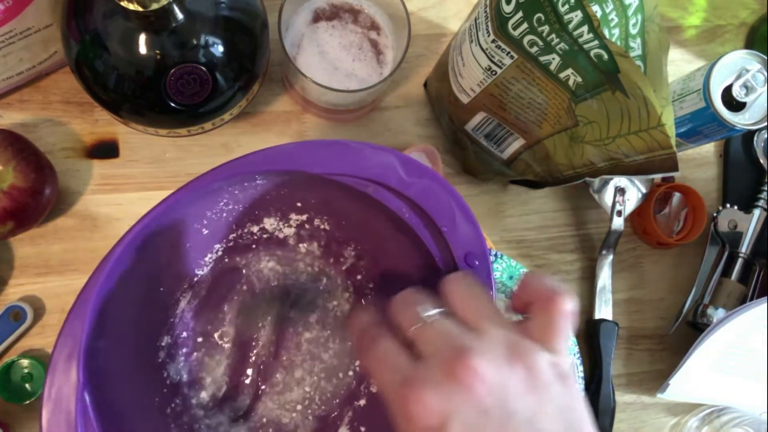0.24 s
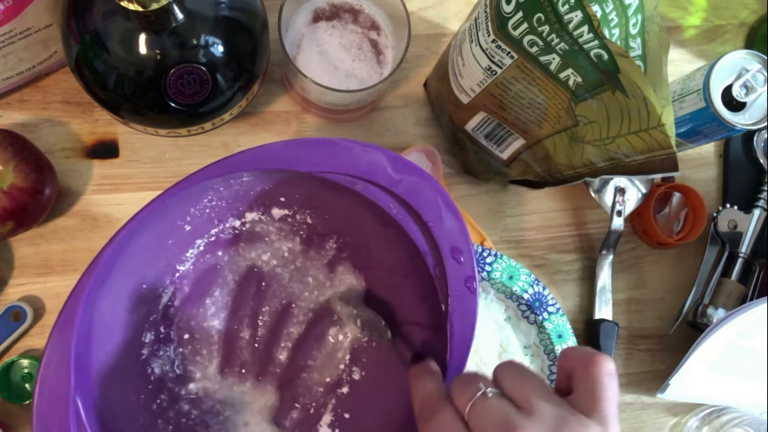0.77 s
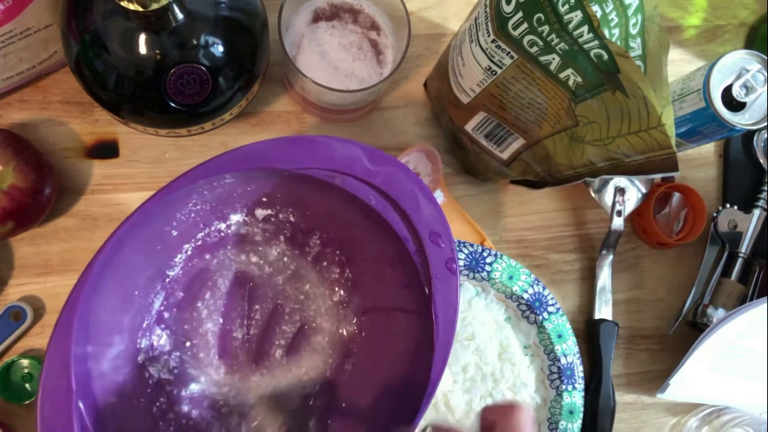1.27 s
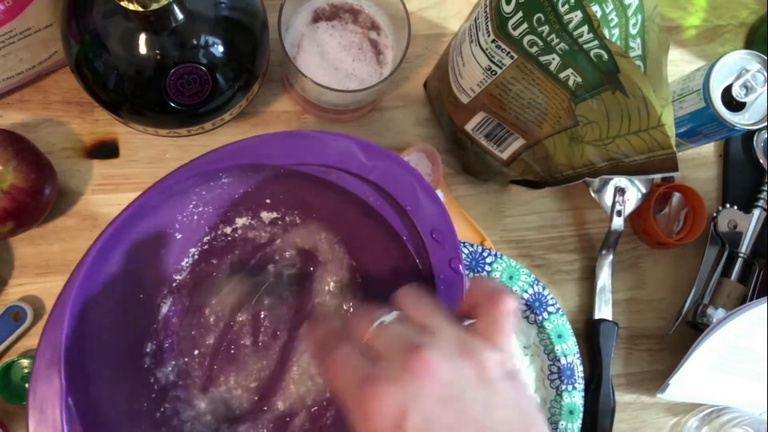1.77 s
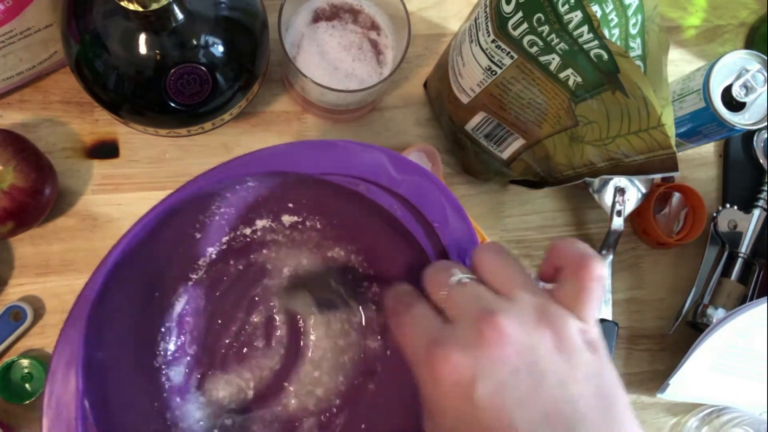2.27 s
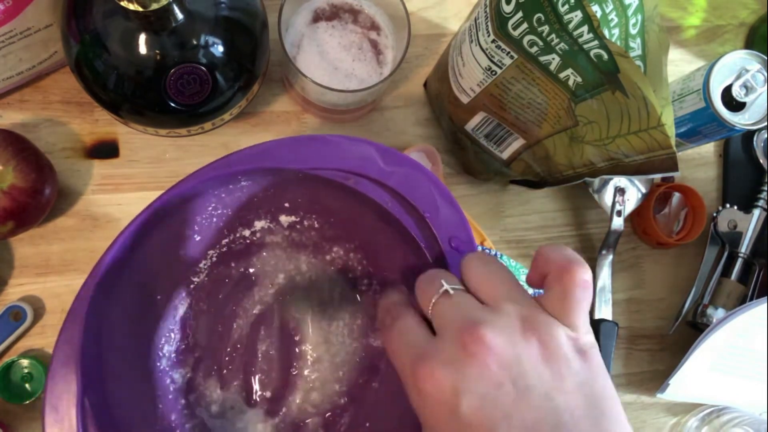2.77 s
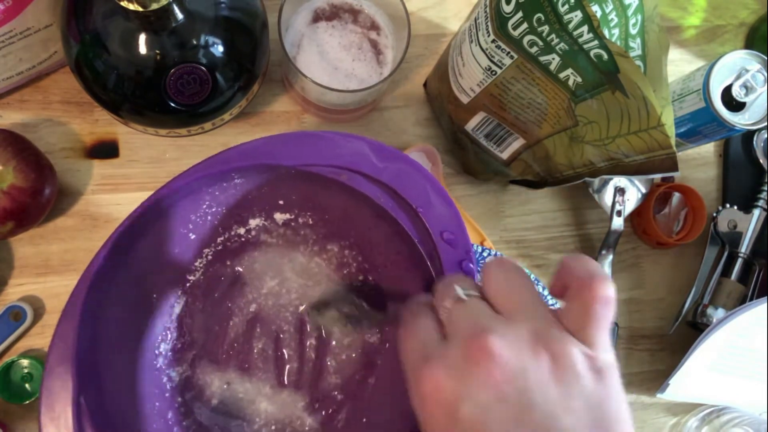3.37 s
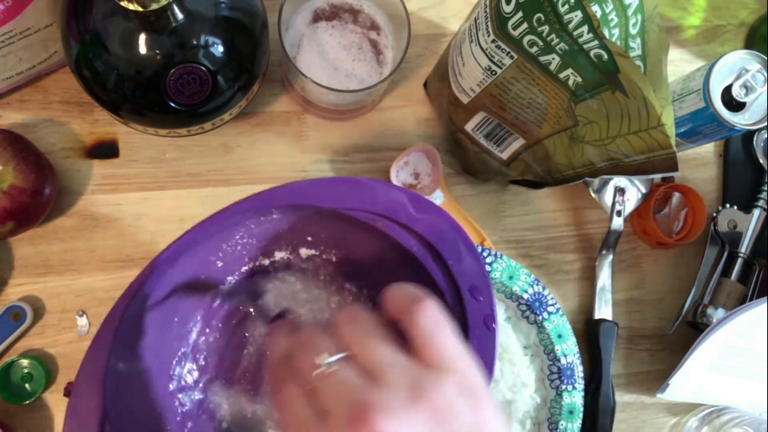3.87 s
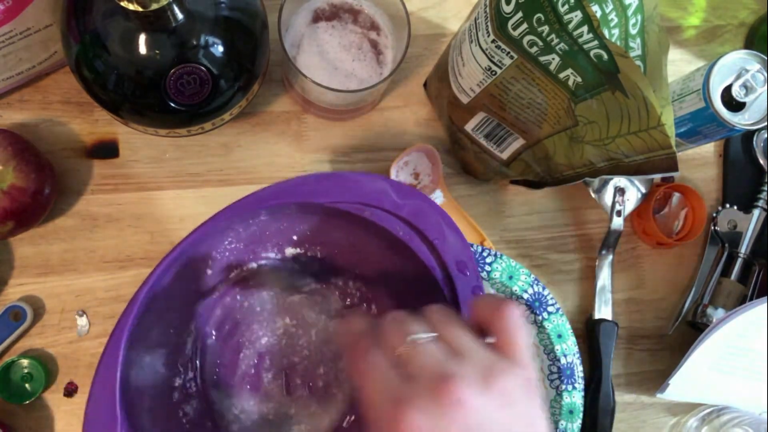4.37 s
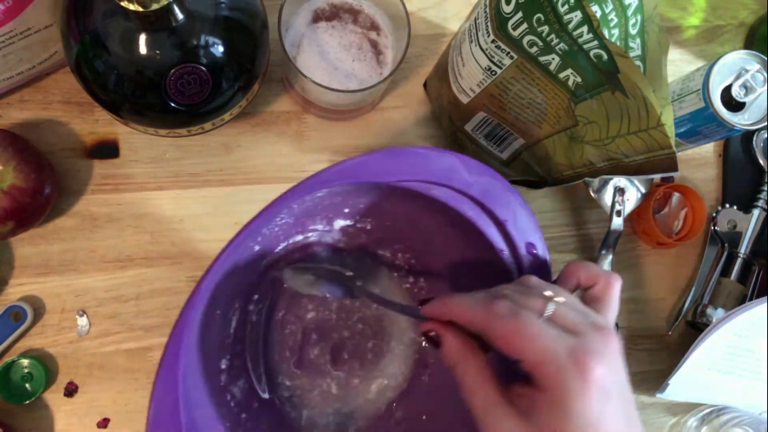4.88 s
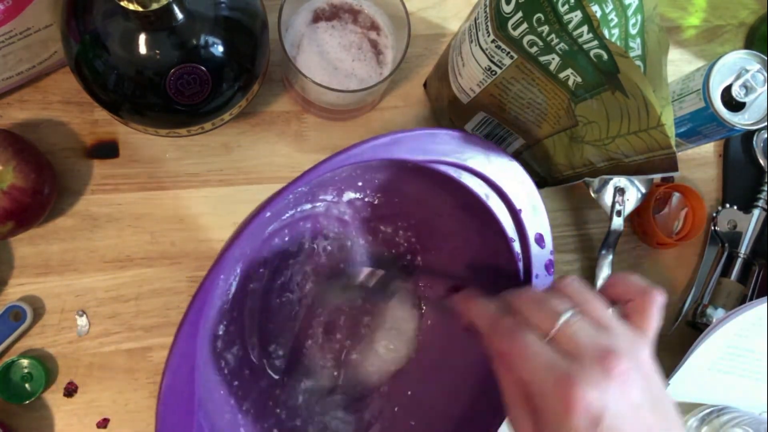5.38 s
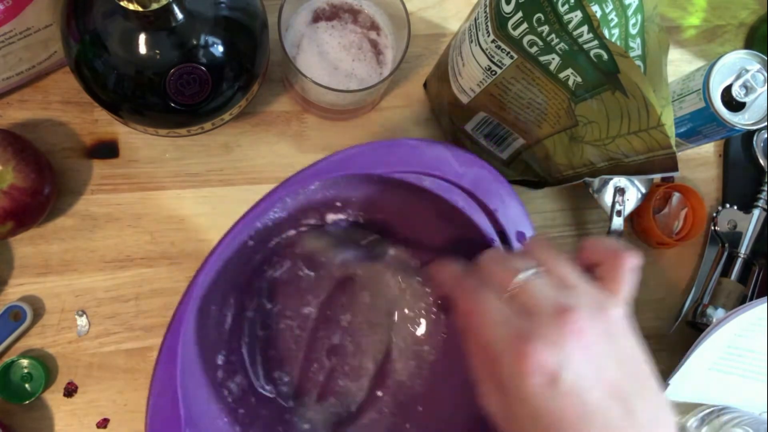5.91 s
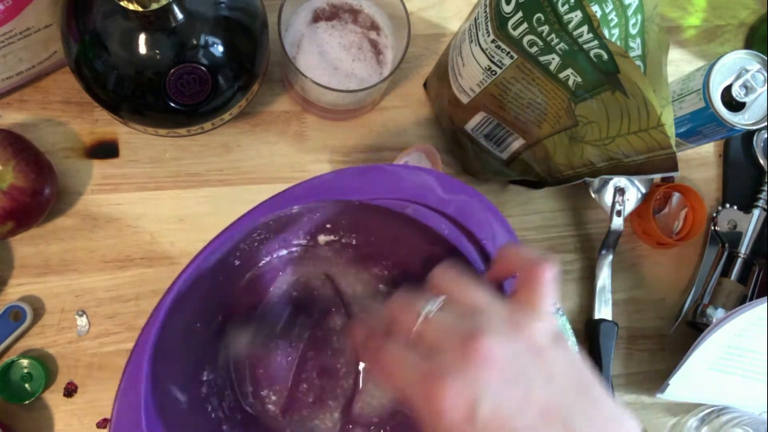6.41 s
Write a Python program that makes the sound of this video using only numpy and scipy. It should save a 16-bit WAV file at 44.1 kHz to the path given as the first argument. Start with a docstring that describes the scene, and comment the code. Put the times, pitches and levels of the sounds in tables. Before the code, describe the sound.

Close up in a small kitchen, a metal spoon stirs grainy sugar in a plastic bowl. Rapid hard scrapes crunch and fizz, alternating with lighter sweeps, and the bowl wall answers with hollow, pitch-bending bonks. Midway the strokes soften and lengthen, then a few louder hollow scrapes follow. Occasional taps and tiny squeals stand out over a very faint low hum.

```python
"""A light scrape comes first over a faint hum: a metal spoon stirs wet sugar round a plastic bowl, heard close up.
Hard digs and light sweeps crunch the crystals: random clicks ring the bowl's modes, and small cracks add fizz.
Friction drives the bowl's wall, whose pitch bends as the spoon bears on it; it bonks as it springs free.
The floor of the bowl groans at hard shoves. Now and then the spoon lifts, lands, squeals or knocks the plastic.
Lumps of sugar burst, and the small kitchen adds a short, quiet tail and the hum of an appliance."""
import sys
import numpy as np
from scipy import signal
from scipy.io import wavfile
from scipy.ndimage import uniform_filter1d

SR = 44100
rng = np.random.default_rng(int(sys.argv[2]) if len(sys.argv) > 2 else 0)


def to_wav(sig):
    """Store sig (one row per channel, or 1-D mono) as 16-bit WAV at the path in sys.argv[1].

    Samples outside -1..1 are clipped; the rate is SR.
    """
    pcm = np.clip(np.atleast_2d(sig), -1, 1) * 32767
    pcm = np.round(pcm).astype(np.int16)
    wavfile.write(sys.argv[1], SR, pcm.T)  # frames by channels


N = 293265
TIME = np.arange(N) / SR
CONTROL_TIME = TIME[::32]  # slow controls are worked out at every 32nd sample only

# room air, filter curve: (f/Hz, gain/dB)
ROOM_AIR_COLOUR = [(30, -16), (58, 3), (100, -2), (160, 7.5), (230, 3.5), (400, 3.5), (900, -20),
                   (16000, -23)]
# appliance hum: (f/Hz, level/dB)
HUM_TONES = [(156.8, -63.5)]
# the spoon digs through the sugar and bears on the bowl, one row a stroke:
# (middle t/s, length/s, level/dB, extra fizz level/dB, hollow wall ring before HOLLOW_SHARE/dB,
#  wall pitch aimed for, before BEND_GAIN f/Hz)
DIG_STROKES = [(0.215, 0.14, -18.5, 5.5, -7, 893), (0.368, 0.21, -27, 6, -0.5, 830),
               (0.472, 0.15, -21.5, 5.5, -2.5, 894), (0.628, 0.13, -18.5, -1, -4, 922),
               (0.725, 0.12, -21, 3, 1, 886), (0.875, 0.14, -19.5, -6, -5, 907),
               (0.949, 0.081, -27, -17, 4, 820), (1.505, 0.11, -27.5, -3, 4.5, 897),
               (1.595, 0.1, -23, 3, -1, 900), (1.78, 0.17, -24.5, 4, -1, 850),
               (1.886, 0.21, -26.5, 2, -1, 786), (2.085, 0.17, -21.5, 0, -0.5, 908),
               (2.385, 0.17, -25, 0, 1.5, 940), (2.485, 0.12, -21, 6, -6, 826),
               (2.632, 0.19, -25, 0, 0, 868), (2.744, 0.12, -21, 7, -8, 840),
               (2.891, 0.14, -21, 1, -2.5, 866), (3.01, 0.11, -18.5, 4.5, -2, 898),
               (3.164, 0.19, -24.5, -21, 1.5, 827), (3.274, 0.11, -20.5, 2.5, -5, 827),
               (3.41, 0.14, -28, -1.5, -0.5, 844), (3.547, 0.15, -31.0, -17, 3, 825),
               (4.185, 0.11, -27, 2, -2.5, 879), (4.596, 0.24, -38, -4, 6, 907),
               (4.865, 0.21, -32, 3, -1, 786), (5.115, 0.18, -38, 3, 2, 823),
               (5.261, 0.13, -30, -1, 5, 877), (5.501, 0.21, -24.5, -0.5, -2, 878),
               (5.678, 0.15, -25, -6, -3, 887), (5.875, 0.29, -28, 1.5, -3.5, 808),
               (6.388, 0.2, -26, -0.5, 1.5, 908)]
# the spoon sweeps lightly back along the side; same columns
SWEEP_STROKES = [(0.0, 0.1, -33.5, -4, 3.5, 747), (0.115, 0.12, -32.5, -0.5, -12, 795),
                 (0.819, 0.15, -32.5, 3, 1, 810), (0.979, 0.093, -25, 1, -12, 816),
                 (1.086, 0.11, -24.5, -2, -10, 803), (1.197, 0.13, -28.5, 2, -6, 803),
                 (1.282, 0.16, -31, 6, -1.5, 801), (1.402, 0.14, -29, 4, -2, 808),
                 (1.639, 0.094, -26.5, 1.5, -2, 790), (1.941, 0.086, -22.5, -1, -10.5, 745),
                 (2.194, 0.24, -24.5, -2.5, -4, 766), (3.738, 0.16, -34.5, 4, 2.5, 683),
                 (3.831, 0.11, -33.5, 2, 5, 640), (3.999, 0.28, -29, 1.5, -4, 746.5),
                 (4.251, 0.16, -20.5, -3.5, -9, 688), (4.42, 0.21, -21, -7, -10.5, 727),
                 (4.498, 0.14, -23.5, -6, -7, 723), (4.683, 0.16, -22, 0, -11.5, 737),
                 (5.334, 0.12, -33, 1, 2, 671), (5.727, 0.045, -24, 1, -3.5, 810),
                 (6.061, 0.15, -21.5, 1, -2, 801), (6.188, 0.2, -31, 3, -4.5, 798),
                 (6.283, 0.12, -24.5, -4, -7.5, 810), (6.521, 0.17, -22.5, 1.5, -7, 782),
                 (6.606, 0.38, -36.5, 1, 1.5, 730)]
# how each layer follows a stroke: name: (level relative to it/dB, lag/stroke lengths, half-width/stroke lengths)
# a dig rasps, and the bowl's floor springs back after it
DIG_RESPONSE = {"crunch": (-5, -0.028, 0.49), "fizz": (-13, -0.037, 0.45), "rasp": (-6.5, -0.0058, 0.49),
                "wall": (-3, -0.019, 0.58), "floor": (-33.5, 0.41, 0.7), "steel": (-24.5, -.02, 0.15)}
# a sweep hisses, and the wall rings on behind it
SWEEP_RESPONSE = {"crunch": (-6, 0.018, 0.35), "fizz": (-8, 0.028, 0.5), "rasp": (-17, 0.041, 0.54),
                  "wall": (-4.5, 0.03, 0.83), "floor": (-37, 0.6, 0.34), "steel": (-12.5, 0.018, 0.43)}
# level each layer gains per dB of a stroke's hollow ring: name: share/(dB per dB)
HOLLOW_SHARE = {"rasp": 0.35, "wall": 0.91, "steel": -0.31}
# crunch of the sugar, filter curve: (f/Hz, gain/dB)
CRUNCH_COLOUR = [(500, 1.5), (1200, -30.5), (2000, -9), (2400, 5), (3200, 6), (3700, 4), (4500, 4),
                 (5200, 4), (5900, -4), (8000, -7.5), (15000, -25.5)]
# fizz of the smallest crystals, filter curve: (f/Hz, gain/dB)
FIZZ_COLOUR = [(800, -48), (3500, -3), (5800, 2.5), (7000, -0.5), (8300, 1.5), (9100, 4.5), (9600, 2),
               (10500, -8), (12500, -7.5), (15500, -10)]
# what the bowl rings with, middle modes: (f/Hz, narrowest width/Hz, level/dB)
MIDDLE_MODES = [(1350.5, 33, 1), (1615, 65, -5.5), (2080, 62, -8), (2290, 43, -1)]
# the bowl's high modes; same columns
HIGH_MODES = [(2634, 108, 2.4), (3091, 60, 9.3), (3545, 244, 0.39), (4010, 264, 6), (4480, 48, 11),
              (4830, 86, 6.8), (5100, 38, 8.6)]
# modes of the spoon itself; same columns
SPOON_MODES = [(2955, 180, -3), (4290, 230, 0.5), (4433, 100, 7), (4730, 104, 3.5)]
# rasp of the wall, filter curve: (f/Hz, gain/dB)
RASP_COLOUR = [(300, -68.5), (620, -57.5), (950, 11), (1200, -1.5), (1600, -1), (2200, -1.5), (3000, -33)]
# the wall while the spoon presses it, filter curve: (f/Hz, gain/dB)
PRESSED_WALL_COLOUR = [(300, -28.5), (570, 6), (680, -2), (950, -5), (1300, 0.5)]
# how long the kitchen's tail takes to fall by 60 dB: (f/Hz, decay time/s)
KITCHEN_DECAY = [(200, 0.78), (800, 0.13), (16000, 0.15)]
# the spoon eases off the bowl and lands again: (landing t/s, depth of lift/dB, bite on landing/dB)
SPOON_LANDINGS = [(0.0736, 4, 13.5), (0.322, 15, 5.5), (0.431, 7, 8), (0.687, 7.5, 1), (0.801, 6, 4.5),
                  (0.919, 10, 4), (1.064, -0.5, 11), (1.164, 4, 5.5), (1.368, 9.5, 8), (1.87, 5.5, 5),
                  (2.003, 3, 5.5), (3.232, 6.5, 6), (3.503, 6, 7.5), (3.92, 17, 0.5), (5.316, 9, 4)]
# the wall springs free with a hollow bonk: (middle t/s, half-width/s, peak level/dB, f/Hz)
WALL_BONKS = [(0.249, 0.03992, -21.5, 764.7), (0.436, 0.015, -16.5, 841.4), (0.499, 0.02994, -21, 775.8),
              (0.735, 0.0279, -18.5, 829.7), (0.867, 0.0352, -19, 876.2), (0.945, 0.022, -19.5, 857),
              (1.499, 0.02488, -20, 882), (1.712, 0.0135, -23, 764), (1.76, .016, -19.5, 826.3),
              (1.959, 0.0348, -21, 779.4), (2.019, 0.0215, -23, 763.4), (2.135, 0.0369, -17, 791.7),
              (2.237, 0.02147, -22, 778.7), (2.363, .02, -19, 932.3), (2.52, 0.02213, -22, 756.6),
              (2.623, 0.01534, -19, 851.8), (2.911, 0.015, -19, 817.5), (3.03, 0.0267, -19, 804.7),
              (3.183, 0.02, -19, 817.6), (3.241, 0.01553, -15, 859.7), (4.197, 0.0246, -20.5, 798.4),
              (4.303, 0.00687, -22, 690), (4.325, 0.00723, -22, 683.4), (4.711, 0.023, -22, 737.2),
              (5.248, 0.0122, -23, 900.5), (5.572, .013, -23.5, 809), (6.06, 0.0608, -21, 783),
              (6.358, 0.02504, -20, 860.5), (6.408, 0.026, -18, 913.3), (6.48, 0.019, -21, 788.7),
              (6.569, 0.0255, -17, 769.4)]
# the hardest shoves make the floor groan: (middle t/s, half-width/s, level/dB, f/Hz, glide/(Hz per s))
FLOOR_SHOVES = [(.265, .05, -41.5, 473, 500), (.52, 0.021, -33.5, 510, -1000), (2.235, 0.039, -35, 480, 0),
                (3.835, 0.092, -40.5, 530, 500), (4.161, 0.065, -41, 452, 1700),
                (4.295, 0.05, -31.5, 552, 0), (4.375, 0.058, -39, 475, -1300),
                (4.67, 0.12, -45.5, 501, 700), (6.135, 0.068, -42.5, 462, 1598),
                (6.2, 0.059, -34.5, 542, 300), (6.28, 0.037, -44, 493, -1700)]
# partials of that groan: (multiple of its pitch, level/dB)
GROAN_PARTIALS = [(0.999, -0.5), (1.25, -3)]
# the spoon's edge catches and squeals: (middle t/s, half-width/s, level/dB, f/Hz)
SPOON_SQUEALS = [(.457, 0.0064, -22.5, 3120), (.504, 0.0081, -26, 3180), (0.8934, 0.0023, -28, 4900),
                 (3.007, 0.011, -21.5, 4920), (4.231, 0.026, -27, 3050), (4.232, 0.019, -23, 4210),
                 (5.11, 0.033, -36, 2920), (6.054, 0.095, -32, 3146), (6.297, 0.037, -36.5, 3020),
                 (6.502, 0.024, -28.5, 3070)]
# the spoon knocks or catches on the plastic: (t/s, level during the chatter/dB,
#  wall thud relative to it/dB, treble relative to it/dB, fading time of the chatter/s)
SPOON_KNOCKS = [(0.4544, -25.5, -17, -14, .004), (0.478, -27.5, -17, 4, .004), (0.743, -25, -2, -8, 0.0061),
                (1.082, -29, -14, -16, 0.0034), (0.8905, -15.5, -6, -22, .0045),
                (1.6417, -21, -17, -11, .008), (5.315, -27, -1, -6, .009), (1.871, -33.5, 8.5, -19, 0.0066),
                (1.932, -31, -6, -0.5, 0.0033), (3.2361, -35.5, 9, -17, .005),
                (3.3024, -23, -11, -10, 0.008), (4.227, -27, -2, -20, 0.0045)]
# treble tick of a knock, filter curve: (f/Hz, gain/dB)
TICK_COLOUR = [(500, -16), (2000, 17), (5000, -7), (9000, 23), (16000, -13)]
# a lump of sugar bursts under the spoon: (t/s, level/dB)
SUGAR_LUMPS = [(0.463, -24), (.764, -27.5), (.966, -19.5), (2.773, -21.5), (3.275, -21.5), (5.678, -24)]

EDGE_POWER, SKIRT_DB = 1.72, -90  # how squarely a stroke swells and fades, and where its fade stops
FIZZ_EDGE_POWER = 1.7  # the same for the fizz
DIG_LEAN, SWEEP_LEAN = 0.1, 0.0095  # a stroke builds slowly, lets go fast: peak late by this share of a half-width
RASP_DB_PER_S, FLOOR_DB_PER_S, STEEL_DB_PER_S = 0.08, 0.8, .5  # slow change of colour as the stirring goes on
WALL_HZ = 780  # the wall's main mode when nothing presses on it
BEND_POWER, BEND_GAIN = 0.46, 1.136  # the wall's pitch bends with this power of the force
FIZZ_BRIGHTEN, FIZZ_PIVOT_DB = 0.21, -30.5  # above this force the finest cracks gain on the rest, by this power
FLUTTER_DB, FLUTTER_HZ = 2.0, 44.9  # the wall's free ring breaks up as the spoon sticks and slips
LOW_WALL_HZ, LOW_WALL_DB = 646, -16  # the wall's lower mode, which wanders and comes and goes
# the floor's note rises and grows as the wall's pitch sags, and wanders by a share of itself
FLOOR_HZ, FLOOR_HZ_PER_HZ, FLOOR_DB_PER_HZ, FLOOR_WANDER = 417, 0.93, 0.145, 0.12
RUB_HZ, RUB_DB, RUB_DB_PER_S = 346, -42, 1.4  # the bowl's base rubs on the counter, louder as time goes on
LIFT_S, BITE_S, LAND_S = 0.029, 0.014, .008  # time to ease off, for the bite to relax, and to land
UNEVEN_DB, UNEVEN_HZ = 1.03, 17  # the spoon's pressure wavers as it meets lumps
BONK_SAG_HZ_PER_S = 500  # the pitch falls as the wall relaxes
BONK_RELIEF_DB = -6  # the spoon's drag on the wall eases meanwhile
SQUEAL_WIDTH_HZ = 115  # width of the narrower of two resonances
KNOCK_DAMPING_HZ, SLIP_S = 110, .0014  # widening of modes by the spoon's touch; mean time between contacts
LUMP_S, LUMP_RASP_DB = 0.0073, -11.5  # half-width of a burst; how much of it reaches the middle modes


def amp(db):
    """Turns decibels into gain."""
    return np.exp(np.asarray(db) * (np.log(10) / 20))


def unit(x):
    """Scales a sound to rms 1."""
    return x / np.sqrt(np.mean(x ** 2) + 1e-20)


def read(points, hz):
    """Reads a curve at the given pitches, on a log-frequency axis."""
    f, value = np.transpose(points)
    return np.interp(np.log(hz + 1), np.log(f + 1), value)


def add(mix, s, sound):
    """Adds a sound to the mix at time s."""
    part = mix[max(round(s * SR), 0):][:len(sound)]
    part += sound[:len(part)]


def per_sample(control):
    """Draws a control, known at every 32nd sample, out over all samples."""
    return np.interp(TIME, CONTROL_TIME, control)


def drift(rate_hz):
    """A random wander of rms about 1: sixteen sines with random rates round rate_hz."""
    hz = rate_hz * rng.uniform(.15, 1.3, (16, 1))
    phase = rng.random((16, 1))
    angle = (2 * np.pi * (hz * CONTROL_TIME + phase)).astype(np.float32)
    return per_sample(np.sin(angle).sum(0) / np.sqrt(8))


def colour(x, points, size=2048):
    """A causal filter with the given spectrum, so that clicks keep their sharp front."""
    gain_db = np.maximum(read(points, abs(np.fft.fftfreq(size, 1 / SR))), -80)
    log_gain = np.log(amp(gain_db))
    taps = np.fft.ifft(np.exp(np.conj(signal.hilbert(log_gain)))).real
    return signal.oaconvolve(x, taps[:size // 2])[:len(x)]


def resonate(x, hz, width):
    """A resonance of gain 1 at a fixed pitch hz, or following the curve hz."""
    r = np.exp(-np.pi * width / SR)
    if np.ndim(hz) == 0:
        return 2 * signal.lfilter([1 - r], [1, -r * np.exp(2j * np.pi * hz / SR)], x + 1e-18).real
    # for a moving pitch: turn it down to 0 Hz, smooth, and turn it back up
    angle = (2 * np.pi * (np.cumsum(hz / SR) % 1)).astype(np.float32)
    turn = np.cos(angle) + 1j * np.sin(angle)
    return 2 * (turn * signal.lfilter([1 - r], [1, -r], x * turn.conj() + 1e-18)).real


def steady(x, span_s):
    """Evens out the slow level of a texture, leaving its fast grain."""
    size = max(int(span_s * SR), 8)
    power = uniform_filter1d(uniform_filter1d(x ** 2, size), size)
    return x / np.sqrt(abs(power) + 1e-12)


def swell(t, half_s, lean=0, power=EDGE_POWER):
    """The force of one push: 20 dB down half_s before and after its middle; a positive lean makes its peak late."""
    u = t / half_s - lean
    return amp(np.maximum(-20 * abs(u / (1 - np.sign(u) * lean)) ** power, SKIRT_DB))


def blend(sizes, pitches_hz):
    """Joins overlapping pushes on one mode into one size and one pitch."""
    power = sizes ** 2 + 1e-20
    size = np.sqrt(power.sum(0))
    pitch_hz = (power * pitches_hz).sum(0) / power.sum(0)
    return per_sample(size), per_sample(pitch_hz)


def crystals(per_s, spread_db, smear, slip_db):
    """Clicks of breaking crystals over a smooth smear of paste, bunched as the spoon sticks and slips."""
    sizes = amp(spread_db * np.minimum(rng.exponential(1, N), 4)) * rng.choice([-1, 1], N)
    clicks = unit(sizes * (rng.random(N) < per_s / SR))
    grains = clicks + smear * rng.standard_normal(N)
    return grains * amp(slip_db * drift(rate_hz=260))


def contact_ring(x, ring_s, direct, size=8192):
    """Every grain rings the bowl's dense high modes; which of them answer changes as the spoon moves on."""
    out, t = np.zeros(N), np.arange(size // 8) / SR
    for start in range(0, N, size // 2):
        ring = rng.standard_normal(len(t)) * np.exp(-t / ring_s)
        ring = ring / np.linalg.norm(ring) + direct * (t == 0)
        # overlapping stretches fade into each other
        first = max(start - size // 2, 0)
        part = x[first:start + size // 2]
        fade = np.cos(np.pi * (np.arange(len(part)) + first - start) / size)
        add(out, first / SR, signal.fftconvolve(part * fade, ring))
    return unit(out)


def moving_modes(drive, modes, bend, wander):
    """Each mode arches with the spoon's force, and drifts and fades as the point of contact moves."""
    out = np.zeros(N)
    for hz, width, db in modes:
        track_hz = hz * bend * (1 + wander * drift(rate_hz=7))
        fade_db = 4.8 * drift(rate_hz=14)
        out += amp(db + fade_db) * resonate(resonate(drive, track_hz, width), track_hz, 5 * width)
    return unit(out)


def groan(hz):
    """Uneven bumps ring one low mode that follows the curve hz; rms about 1."""
    bumps = crystals(per_s=260, spread_db=3.5, smear=0.4, slip_db=6.0)
    return steady(resonate(resonate(bumps, hz, 35), hz, 130), span_s=0.023)


def background():
    """Quiet room air is filtered noise; the appliance's hum is a sine that wavers a little."""
    hum = np.zeros(N)
    for hz, db in HUM_TONES:
        level = amp(db + 0.41 * drift(rate_hz=9)) * np.sqrt(2)
        hum += level * np.sin(2 * np.pi * hz * TIME + 0.15 * drift(rate_hz=2.18))
    air = unit(colour(rng.standard_normal(N), ROOM_AIR_COLOUR, size=8192))
    return hum + amp(-61.0) * air


def stroke_forces(layer):
    """For every dig and sweep: its force on one layer over time, its level there, and its wall pitch."""
    forces, levels_db = [], []
    power = FIZZ_EDGE_POWER if layer == "fizz" else EDGE_POWER
    groups = (DIG_STROKES, DIG_RESPONSE, DIG_LEAN), (SWEEP_STROKES, SWEEP_RESPONSE, SWEEP_LEAN)
    for strokes, response, lean in groups:
        s, length_s, level_db, bright_db, hollow_db, _ = np.transpose(strokes)[:, :, None]
        offset_db, lag, half = response[layer]
        forces.append(swell(CONTROL_TIME - s - lag * length_s, half * length_s, lean, power))
        layer_db = level_db + offset_db + HOLLOW_SHARE.get(layer, 0) * hollow_db
        levels_db.append(layer_db + (layer == "fizz") * bright_db)
    pitches_hz = np.vstack([DIG_STROKES, SWEEP_STROKES])[:, -1:]
    return np.vstack(forces), np.vstack(levels_db), pitches_hz


def strength(layer):
    """How hard all the strokes together drive one layer."""
    force, level_db, _ = stroke_forces(layer)
    return per_sample(np.linalg.norm(amp(level_db) * force, axis=0))


def wall_pitch():
    """The wall's pitch bends most at full force and returns to rest between strokes."""
    force, level_db, pitch_hz = stroke_forces("wall")
    power = (amp(level_db) * force) ** 2
    pull_hz = (power * (pitch_hz - WALL_HZ) * force ** BEND_POWER).sum(0)
    bend_hz = pull_hz / (power.sum(0) + amp(-74) ** 2)
    return per_sample(WALL_HZ + BEND_GAIN * bend_hz)


def crunch(stiffness):
    """Sugar ground between spoon and plastic rings the bowl's high modes."""
    grit = crystals(per_s=750, spread_db=3.2, smear=.11, slip_db=2.2)
    ringing = moving_modes(grit, HIGH_MODES, stiffness ** 0.261, wander=0.0227)
    dense = contact_ring(grit, ring_s=.0046, direct=.18)
    return steady(colour(ringing + 1.81 * dense, CRUNCH_COLOUR), span_s=0.024)


def fizz(force):
    """The smallest crystals crack, each size in its own band; the finest need the most force."""
    bands = [[(8000, 0), (10000, -20)], [(8000, -20), (10000, 0)]]  # (f/Hz, gain/dB): coarse, then fine
    cracks = [colour(crystals(per_s=1700, spread_db=3.5, smear=.28, slip_db=2.2), band) for band in bands]
    coarse, fine = [crack * amp(2.0 * drift(rate_hz=40)) for crack in cracks]
    fine_gain = (force / amp(FIZZ_PIVOT_DB)) ** FIZZ_BRIGHTEN
    sound = contact_ring(coarse + fine * fine_gain, ring_s=.0036, direct=.22)
    return force * steady(colour(sound, FIZZ_COLOUR), span_s=0.012)


def steel(drag):
    """Friction makes the spoon's own modes ring, each coming and going."""
    sound = np.zeros(N)
    for hz, width, db in SPOON_MODES:
        ring = resonate(resonate(drag, hz, width), hz, 3 * width)
        sound += amp(db + 4.3 * drift(rate_hz=9)) * ring
    return steady(sound, span_s=0.023)


def rasp(drag, stiffness):
    """Friction rings the wall's middle modes."""
    sound = moving_modes(drag, MIDDLE_MODES, stiffness ** 0.38, wander=0.039)
    sound += .65 * contact_ring(colour(drag, RASP_COLOUR), ring_s=.0026, direct=.17)
    return steady(sound, span_s=0.035)


def without_bass(x):
    """A steep cut below 620 Hz keeps the sugar, spoon and scrape thin and free of rumble."""
    return signal.sosfilt(signal.butter(4, 620, "highpass", fs=SR, output="sos"), x)


def wall(drag, gain, pitch_hz):
    """Friction drives the main wall mode: hoarse while the spoon bends it, a clear hollow ring when it runs free."""
    bent_hz = pitch_hz * (1 + .035 * drift(rate_hz=28))
    pressed = resonate(resonate(drag, bent_hz, 80), bent_hz, 300)
    pressed = steady(colour(pressed, PRESSED_WALL_COLOUR), span_s=0.037)
    # the free ring stays near the resting pitch
    ring_hz = np.clip(uniform_filter1d(pitch_hz, SR // 20), WALL_HZ - 45, WALL_HZ + 35)
    ring_hz = ring_hz * (1 + .016 * drift(rate_hz=20))
    free = steady(resonate(resonate(drag, ring_hz, 22), ring_hz, 70), span_s=.024)
    freedom = .85 / (1 + ((pitch_hz - WALL_HZ + 8) / 58) ** 4)
    # the free ring outlasts the push that started it
    keep = np.exp(-1 / (.008 * SR))
    ring_power = signal.lfilter([1 - keep], [1, -keep], gain ** 2 * freedom)
    ring_gain = np.sqrt(ring_power + amp(-75.0) ** 2)
    flutter = amp(FLUTTER_DB * (drift(rate_hz=FLUTTER_HZ) - .5))
    low = groan(LOW_WALL_HZ * (1 + .03 * drift(rate_hz=10))) * amp(4 * drift(rate_hz=18))
    sound = gain * np.sqrt(1 - freedom) * pressed + ring_gain * flutter * free
    sound += amp(LOW_WALL_DB) * strength("wall") * low
    return colour(sound, [(350, -20.0), (560, -32.5), (650, 1.5)])  # keeps the wall's sound light in the bass


def flex(wall_hz):
    """The floor gives unevenly after each stroke, more when the wall is slack; the base rubs with that force's root."""
    slack_hz = np.maximum(WALL_HZ - wall_hz, 0)
    growth = amp(FLOOR_DB_PER_HZ * slack_hz + FLOOR_DB_PER_S * TIME)
    give = strength("floor") * growth + amp(-59.5)
    wander = FLOOR_WANDER * drift(rate_hz=9)
    give_hz = (FLOOR_HZ + FLOOR_HZ_PER_HZ * slack_hz) * (1 + wander)
    rub_hz = RUB_HZ * (1 + wander / 2)
    note, rub = [amp(4.26 * drift(rate_hz=16)) * groan(hz) for hz in (give_hz, rub_hz)]
    return give * note + np.sqrt(give) * amp(RUB_DB + RUB_DB_PER_S * TIME) * rub


def kitchen(x):
    """A short diffuse tail that starts 4 ms after each sound, each band dying at its own speed."""
    taps = rng.standard_normal(SR // 2) * (np.arange(SR // 2) > .004 * SR)
    hz, t, bands = signal.stft(taps, SR, nperseg=256)
    decay = amp(-60 * t / read(KITCHEN_DECAY, hz)[:, None])
    tail = signal.istft(bands * decay, SR, nperseg=256)[1]
    return signal.oaconvolve(x, tail / np.linalg.norm(tail))[:N]


def contact():
    """The spoon's grip on the bowl: it wavers, changes as the spoon lifts before a landing, and bites just after."""
    s, lift_db, bite_db = np.transpose(SPOON_LANDINGS)[:, :, None]
    t = CONTROL_TIME - s
    step_db = np.where(t < 0, -lift_db * np.exp(-(t / LIFT_S) ** 2), bite_db * np.exp(-abs(t) / BITE_S))
    landing_db = uniform_filter1d(per_sample(step_db.sum(0)), int(LAND_S * SR))
    return amp(landing_db + UNEVEN_DB * drift(rate_hz=UNEVEN_HZ))


def bonks():
    """The wall's free swings: their nearly pure tone, and the share of the spoon's drag that is left."""
    s, half_s, peak_db, pitch_hz = np.transpose(WALL_BONKS)[:, :, None]
    t = CONTROL_TIME - s
    force = swell(t, half_s, lean=-0.119)  # it starts faster than it dies
    sagging_hz = pitch_hz - BONK_SAG_HZ_PER_S * np.clip(t, -half_s, half_s)
    size, hz = blend(amp(peak_db) * force, sagging_hz)
    turns = np.cumsum(hz * (1 + 0.023 * drift(rate_hz=60))) / SR
    relief = amp(BONK_RELIEF_DB * per_sample(np.sqrt(force.max(0))))
    return size * np.sin(2 * np.pi * turns), relief


def shoves():
    """At the hardest shoves the floor groans in partials that glide together."""
    s, half_s, level_db, pitch_hz, hz_per_s = np.transpose(FLOOR_SHOVES)[:, :, None]
    t = CONTROL_TIME - s
    gliding_hz = pitch_hz + hz_per_s * np.clip(t, -half_s, half_s)
    size, hz = blend(amp(level_db) * swell(t, half_s), gliding_hz)
    return size * sum(amp(db) * groan(multiple * hz) for multiple, db in GROAN_PARTIALS)


def squeals():
    """For a moment friction locks on to one narrow mode, here noise through a narrow resonance."""
    out, t = np.zeros(N), np.arange(-SR // 6, SR // 6) / SR
    for s, half_s, level_db, hz in SPOON_SQUEALS:
        noise = rng.standard_normal(len(t))
        ring = resonate(resonate(noise, hz, SQUEAL_WIDTH_HZ), hz, 2 * SQUEAL_WIDTH_HZ)
        size = amp(level_db) * swell(t, half_s) * np.sqrt(2)
        add(out, s + t[0], size * steady(ring, span_s=0.013))
    return out


def knocks():
    """Each knock is a short, fading chatter of contacts that rings the damped bowl and spits treble."""
    out, t = np.zeros(N), np.arange(4096) / SR
    for s, level_db, thud_db, treble_db, chatter_s in SPOON_KNOCKS:
        # uneven steps add up; each whole number passed is one contact
        progress = np.cumsum(rng.exponential(1, len(t)) ** 2) / (2 * SLIP_S * SR)
        slips = np.diff(np.floor(progress), prepend=-1) > 0
        chatter = slips * rng.choice([-1, 1], len(t)) + .2 * rng.standard_normal(len(t))
        chatter = chatter * np.exp(-t / chatter_s)
        ring = np.zeros(len(t))
        for hz, width, db in MIDDLE_MODES + HIGH_MODES:
            mode = resonate(chatter, hz, width + KNOCK_DAMPING_HZ)
            ring += rng.choice([-1, 1]) * amp(db) * mode
        thud = resonate(chatter, WALL_HZ, 140)
        tick = colour(chatter, TICK_COLOUR)
        for part, db in (ring, 0), (thud, thud_db), (tick, treble_db):
            add(out, s, amp(level_db + db) * part / np.std(part[t < chatter_s]))
    return signal.sosfilt(signal.butter(2, 380, "highpass", fs=SR, output="sos"), out)


def lumps():
    """The extra force with which lumps of sugar burst."""
    return per_sample(sum(amp(db) * swell(CONTROL_TIME - s, LUMP_S) for s, db in SUGAR_LUMPS))


def scene():
    """The strokes drive sugar, spoon, wall and floor; bonks, squeals, knocks and the kitchen join them."""
    pitch_hz, grip, burst = wall_pitch(), contact(), lumps()
    stiffness = pitch_hz / WALL_HZ
    drag = crystals(per_s=1500, spread_db=3.5, smear=0.28, slip_db=-0.5)
    # between strokes the spoon still rests in the mixture and scrapes faintly
    sugar = (np.hypot(strength("crunch"), burst) + amp(-55.0)) * crunch(stiffness)
    sugar += amp(2.6 * drift(rate_hz=21)) * fizz(strength("fizz"))
    spoon = strength("steel") * amp(STEEL_DB_PER_S * TIME) * steel(drag)
    rasp_force = np.hypot(strength("rasp") * amp(RASP_DB_PER_S * TIME), amp(LUMP_RASP_DB) * burst)
    scrape = (rasp_force + amp(-78.0)) * rasp(drag, stiffness)
    bonk, relief = bonks()
    wall_gain = strength("wall") * grip * relief * amp(1.0 * drift(rate_hz=26))
    hollow = bonk + wall(drag, wall_gain, pitch_hz)
    bowl = without_bass(grip * (sugar + spoon + scrape)) + hollow
    bowl += flex(pitch_hz) + shoves() + squeals() + knocks()
    return (bowl + amp(-15.5) * kitchen(bowl) + background())[None]


def record(dry):
    """A steep low-pass at 15950 Hz takes away the very top of the treble."""
    taps = signal.firwin(511, 15950, window=("kaiser", 9), fs=SR)
    return signal.oaconvolve(dry, taps[None], "same")


dry = scene()
out = record(dry)
to_wav(out)
```